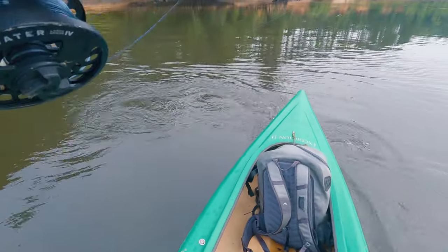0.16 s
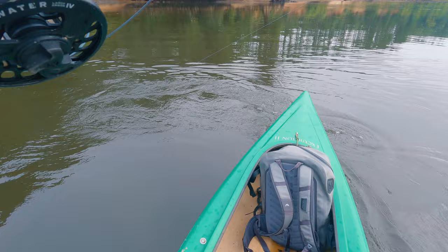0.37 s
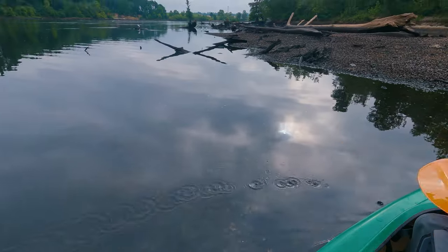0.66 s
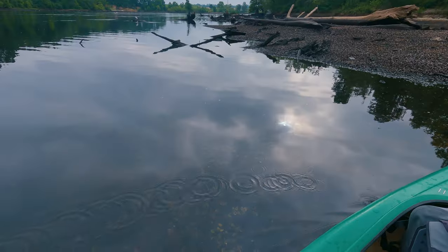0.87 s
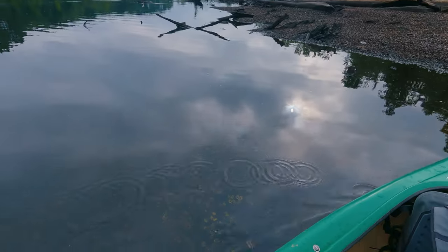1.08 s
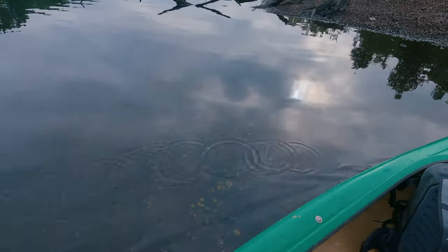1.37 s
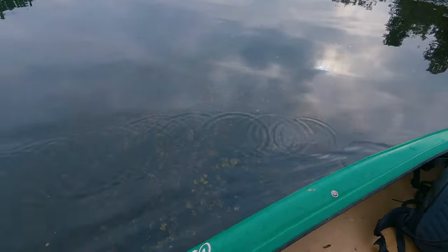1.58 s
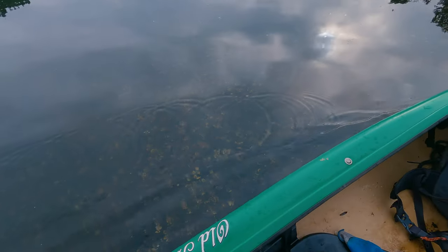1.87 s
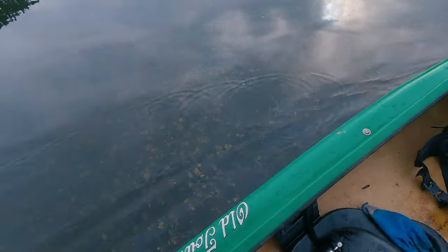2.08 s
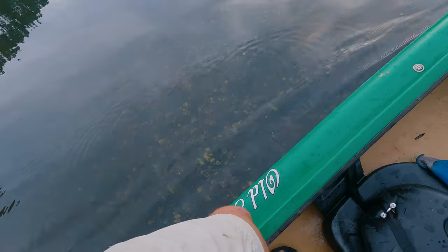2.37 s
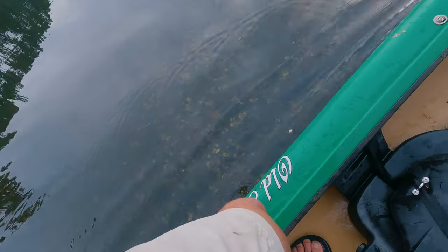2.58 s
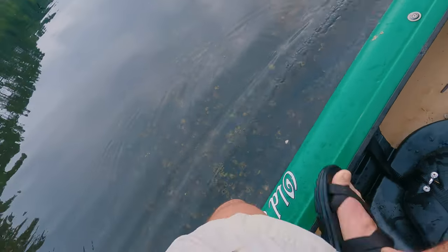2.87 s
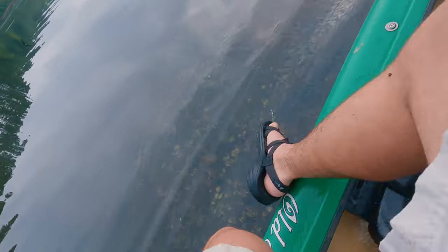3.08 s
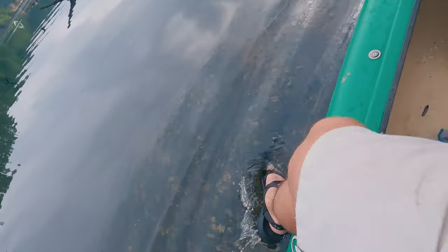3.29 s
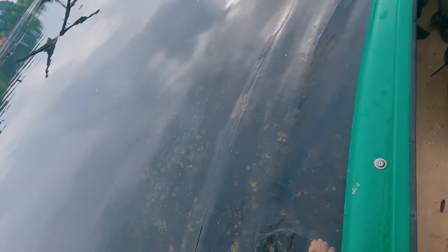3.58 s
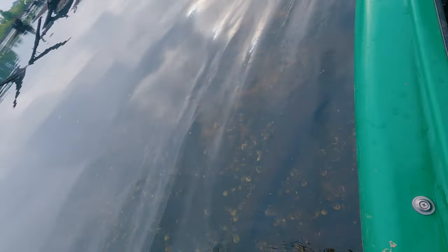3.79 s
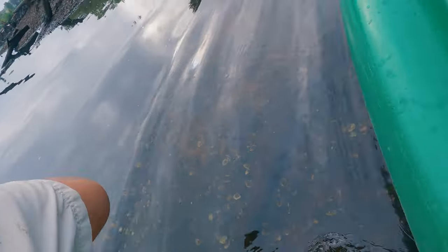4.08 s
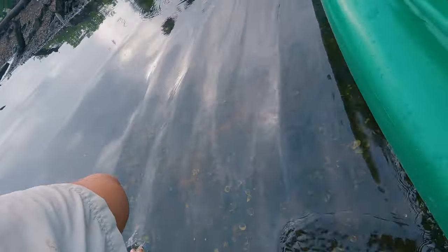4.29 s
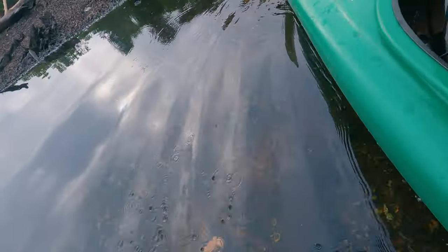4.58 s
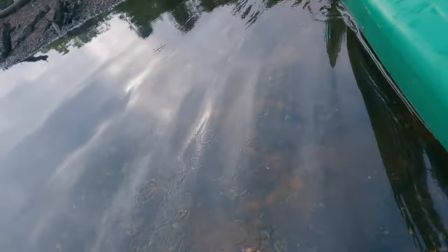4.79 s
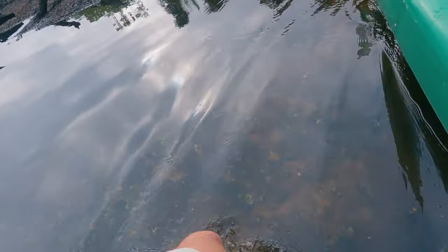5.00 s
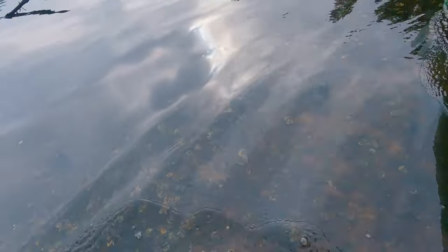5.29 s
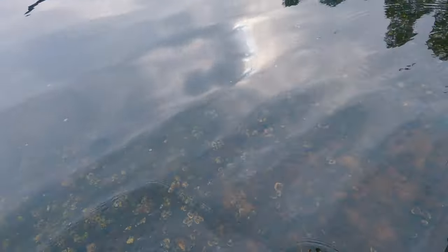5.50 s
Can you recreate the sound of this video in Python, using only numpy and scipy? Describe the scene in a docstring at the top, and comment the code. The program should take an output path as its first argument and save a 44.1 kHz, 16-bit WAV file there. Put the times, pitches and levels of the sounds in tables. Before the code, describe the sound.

A soft, steady hiss of insects and distant water runs throughout, with a low, light breeze. The opening is quiet until a dull bump on the microphone at 1.3 seconds. At about 1.7 seconds comes a loud, close cluster of hollow knocks and clacks as paddle and gear hit a plastic canoe, then a deep thump at 2.2 with rubbing. From around 2 seconds a faint, high insect chirps in rapid, even pulses. A wet sole squeaks briefly at 2.6, followed by more knocks and small wet slaps. From 3.2 seconds someone steps into shallow water: bubbles plop and light spray fizzes around the legs. Strong hull thumps land near 3.1, 3.8 and 4.7 seconds, with another microphone bump at 3.9 and a short, low creak at 4.4. Gurgling and hull rubbing continue, the water easing after 5.2, with light knocks until the end at about 5.6 seconds.

```python
"""Someone shifts about in a plastic canoe on a calm river, then steps into the shallows.
Insects and far water hiss along the bank in a light breeze. The microphone is bumped at 1.3 s.
From 1.6 s paddle, feet and gear knock and rub, ringing the hollow hull; an insect starts chirping.
A wet sole squeaks by stick-slip at 2.6 s. From 3.2 s bubbles ring and spray fizzes round the legs,
with a short groan at 4.4 s. Loud sounds duck the gain."""
import sys
import numpy as np
from scipy import signal
from scipy.fft import rfft, irfft, next_fast_len
from scipy.io import wavfile
from scipy.ndimage import uniform_filter1d, minimum_filter1d

SR = 44100
rng = np.random.default_rng(int(sys.argv[2]) if len(sys.argv) > 2 else 0)


def int16_out(signal):
    """Quantize to a 16-bit WAV file."""
    q = np.round(np.clip(np.atleast_2d(signal).T, -1, 1) * 32767)
    wavfile.write(sys.argv[1], SR, q.astype(np.int16))


N = 248724

# Table levels are relative; each source adds its own offset.
# blows on the hull: t/s, thud/dB, boom/dB, struck panel f/Hz, clack/dB, crunch/dB
HULL_BLOWS = [(0.106, -46, -48, 380, -48, -49), (0.139, -46, -41, 277, -39, -76),
              (1.648, -6.5, -23, 264, -21, -22.5), (1.665, -7.5, -14, 275, -14.5, -29.5),
              (1.679, 0, -32, 192, -18, -28), (1.7, -9, -2.5, 330, -42, -60),
              (1.759, -37, -7, 200, -41, -38.5), (1.867, -29, -21, 173, -36, -64),
              (1.948, -58, -60, 300, -32.5, -41), (2.205, -13, 2, 164, -36, -76),
              (2.213, -12.5, -6, 242, -34, -40), (2.356, -20.5, -14, 320, -33, -40),
              (2.634, -18, -30, 251.8, -19, -26), (2.647, -27, -25, 295, -25.5, -25.5),
              (2.801, -22.5, -39, 357, -33, -29), (2.833, -20.5, -27, 229, -24.5, -45),
              (3.036, -13, -15, 420, -28.5, -59), (3.054, -12, -4.5, 140, -62, -69),
              (3.097, -21.5, -13.5, 160, -26.5, -43), (3.167, -26, -12, 303, -26.5, -45),
              (3.433, -22, -35, 337, -43, -43.5), (3.773, -21.5, -32, 273, -18.5, -41),
              (3.795, -9, -9.5, 193, -25, -48), (3.813, -9, -0.5, 210, -25, -45),
              (3.95, -12.5, -14, 151, -29, -40.5), (4.197, -30, -48, 309, -31.5, -42),
              (4.635, -50, -64, 279, -35.5, -43.5), (4.715, -11.5, 0, 268, -46, -62),
              (4.798, -14.5, -13, 140, -32, -39), (4.821, -17, -31, 164, -55, -37.5),
              (5.018, -27, -21.5, 141.2, -50, -59), (5.438, -26, -21, 302, -36, -41.5),
              (5.599, -22, -52, 250, -56.5, -70)]
# weight and feet working on the hull: t/s, flex/dB, rub/dB
HULL_LOAD = [(0, -77, -50.5), (.46, -64, -59.5), (.48, -65, -76.5), (1.6, -49.5, -59), (1.72, -44, -28),
             (1.9, -66, -48), (2.19, -77, -56.5), (2.3, -31.5, -30.5), (2.55, -32, -41.5), (2.9, -49, -43),
             (3.2, -28, -41), (3.45, -56, -47), (3.9, -20.5, -34.5), (4.1, -38, -35.5), (4.68, -50.5, -50),
             (4.9, -23, -37), (5.12, -27.5, -48.5), (5.23, -44.5, -46.5), (5.64, -32, -45.5)]
# hull modes: f/Hz, level/dB, t60/s
HULL_MODES = [(66.5, -17, 0.16), (83, 2, 0.13), (98.54, 1.5, 0.073), (148, 2, 0.088), (194.1, 1.5, 0.23),
              (247, -5, 0.081), (272.3, 6, 0.051), (313, 0, 0.15), (372, 2.5, 0.083), (492, 8.5, 0.033),
              (568.6, 1.5, 0.04), (652, 9, 0.016), (804, -2.5, 0.081), (919, 10, 0.014),
              (1145, -3.5, 0.048), (1265, -0.5, 0.041), (1520, 1, 0.011), (1670, 0, 0.018),
              (1750, 6, 0.0084)]
# spectrum of the dense upper modes: f/Hz, density/dB
CRUNCH_SPECTRUM = [(880, 1.5), (1500, 3.5), (3190, -5.5), (4300, -10.5), (5380, -19), (8500, -33),
                   (11000, -72)]
# ticks of gear and drops: t/s, level/dB, f/Hz
GEAR_AND_DROP_TICKS = [(1.645, -15, 2830), (1.648, -10.5, 5195), (1.647, -22, 9100), (1.671, -28, 7300),
                       (1.68, -13, 3330), (1.68, -21, 5600), (1.761, -24, 3620), (1.949, -27.5, 6040),
                       (2.213, -27, 8700), (2.636, -35, 11900), (2.733, -34.5, 11300), (3.106, -29, 3700),
                       (3.149, -40, 8800), (3.189, -22.5, 3840), (3.317, -19, 3770), (3.351, -26.5, 2390),
                       (3.573, -47, 6800), (3.679, -39, 9600), (3.692, -24.5, 3400), (3.95, -38, 3610),
                       (4.049, -24, 4270), (4.025, -38, 10100), (4.198, -16.5, 1470), (4.408, -44, 11200),
                       (4.638, -27, 4130), (4.82, -27, 3430), (5.441, -30, 4040)]
# wet slaps of a sole or wavelet: t/s, level/dB, f/Hz
WET_SLAPS = [(2.833, -16, 1000), (3.097, -14.5, 1030), (3.169, -20.5, 1070), (3.215, -15.5, 1110),
             (3.316, -24, 1030), (3.433, -35, 890), (4.198, -18.5, 1210), (4.455, -20, 740)]
# loudest single bubbles: t/s, level/dB, f/Hz, glide/ratio (see add_ping)
SINGLE_BUBBLES = [(3.264, -22.5, 2100, -0.026), (3.455, -22.5, 2470, 0.11), (3.39, -31.5, 1660, 0.06),
                  (3.51, -33, 1610, 0.041), (3.538, -25, 2350, -0.013), (3.742, -26.5, 2170, -0.07),
                  (3.917, -22.5, 2110, 0.059), (3.993, -25, 2130, 0.015), (4.013, -17.5, 1730, 0.83),
                  (4.03, -24.5, 1270, .9), (4.05, -24.5, 1800, 0.92), (4.059, -25.5, 1580, 0.39),
                  (4.07, -33, 1640, 0.16), (4.082, -21, 2270, -0.37), (4.137, -26, 1380, 0.39),
                  (4.12, -33.5, 713, 0.17), (4.17, -33, 696, 0.036), (4.25, -28.5, 710, -0.014),
                  (4.566, -22.5, 826, 0.29), (4.636, -25.5, 695, 0.45), (4.782, -20.5, 787, -0.17),
                  (4.802, -19.5, 2620, 0.32), (4.82, -18.5, 627, -0.25), (4.886, -22.5, 535, -0.094),
                  (4.925, -17.5, 922, 0.42), (5.017, -27, 558, 0.26), (5.032, -30, 1620, -0.11),
                  (5.052, -23, 1700, 0.058), (5.075, -26, 751, -0.14), (5.096, -25.5, 2020, 0.12),
                  (5.163, -27.5, 1520, 0.013), (5.206, -32, 770, 0.019), (5.377, -26.5, 610, 0.19)]
# stirred water: t/s, gurgle/dB, spray/dB
WATER_STIR = [(2.2, -54, -62), (3.0, -52.5, -61), (3.2, -52, -56.5), (3.86, -45, -55), (3.92, -43.5, -63),
              (4.07, -51.5, -56.5), (4.25, -68, -85.5), (4.45, -41, -60), (5.1, -42.5, -59.5),
              (5.222, -58, -71), (5.64, -58, -88)]
# sole slipping on plastic: t/s, slip rate/Hz, level/dB
SOLE_SLIP = [(2.553, 820, -30), (2.568, 760, -24), (2.578, 710, -20), (2.596, 595, -26), (2.615, 660, -33)]
# squeak partials: f/slip rate, level/dB
SOLE_PARTIALS = [(1, 2), (2, -7), (3, -20.5)]
# bumps on the microphone housing: t/s, level/dB, f/Hz, t60/s
HOUSING_BUMPS = [(1.259, -30, 305, 0.053), (1.291, -13.5, 290, 0.025), (1.351, -21, 269, 0.0079),
                 (3.919, -17, 259, 0.046)]
# hiss of insects and far water, with microphone-housing peaks near 8 and 12 kHz
# that also colour the spray: f/Hz, density/dB
HISS_SPECTRUM = [(880, -81), (1500, -3), (1930, -1), (2220, 6.5), (2860, 8.5), (3280, 8.5), (3990, 9),
                 (4800, 7), (5400, 9.5), (7090, 1.5), (7550, 1), (7850, 6), (8200, -0.5), (9100, -10),
                 (10900, -14), (11500, -16), (12000, -8.5), (12600, -18.5), (14600, -25), (15500, -44)]
# breeze: f/Hz, density/dB
BREEZE_SPECTRUM = [(15, -19), (25, 2.5), (46, -8.5), (65, -12.5), (280, -20), (528, -38.5),
                   (1500, -35), (1950, -94)]
# two microphone ports: f/Hz, left lead/rad, diffuse likeness/ratio
MIC_PORTS = [(30, 1, 0.69), (77, 0.22, 0.9), (246, -0.36, 0.47), (730, -0.61, 0.15), (1500, -1.1, 0.71),
             (2670, -1.45, 1), (4770, -0.67, 0.84), (9900, 0.96, 0.65)]

TIME_S = np.arange(N) / SR
FFT_SIZE = next_fast_len(N + SR // 10)
BIN_HZ = np.maximum(np.arange(FFT_SIZE // 2 + 1) * SR / FFT_SIZE, 1)


def hull():
    """Hull modes rung by blows and by the steady flexing and rubbing of weight and feet."""
    _, thud_db, boom_db, panel_hz, clack_db, crunch_db = np.transpose(HULL_BLOWS)
    flex_db, rub_db = envelopes(HULL_LOAD)
    friction = grains(per_s=600, spread_db=4.5) * from_db(3.5 * drift(13.7) - 2)
    chatter = rng.standard_normal((len(HULL_BLOWS), 2, SR // 10))
    boom = blow_force(boom_db - 9.5, chatter[:, 0], stretch=2.3, touch=1.03)
    clack = blow_force(clack_db - 3, chatter[:, 1], stretch=1)
    modes = np.zeros(N)
    for k, (hz, level_db, t60_s) in enumerate(HULL_MODES):
        if hz < 125:
            blows, steady_db = boom, flex_db - 23.5
        elif hz < 450:
            drive_db = thud_db - 6.5 - 38 * np.log2(hz / panel_hz) ** 2  # favours the struck panel
            blows = blow_force(drive_db, chatter[:, k % 2], stretch=0.95, touch=0.99)
            steady_db = rub_db - 27
        else:
            blows, steady_db = clack, rub_db - 32.5
        force = blows + from_db(steady_db) * np.roll(friction, 997 * k)  # shift decorrelates modes
        modes += (-1) ** k * from_db(level_db) * ring(force, hz, t60_s)
    crunch = shaped(blow_force(crunch_db + 33.5, chatter[:, 0], stretch=0.67), CRUNCH_SPECTRUM)
    tick_force = blow_force(crunch_db + 5, chatter[:, 1], stretch=0.86)
    tick = signal.sosfilt(signal.butter(2, [7000, 12500], "band", fs=SR, output="sos"), tick_force)
    return modes + crunch + tick


def blow_force(levels_db, chatter, stretch, touch=0.32):
    """Force of all blows: a clean first touch, then chatter dying over the contact time."""
    contact_s = 0.017 * stretch
    out, n, width = np.zeros(N), np.arange(chatter.shape[1]), contact_s * SR
    envelope = (1 - np.exp(-n / (0.042 * width))) * np.exp(-n / width) / np.sqrt(width / 2)
    for blow, level_db, noise in zip(HULL_BLOWS, levels_db, chatter):
        force = noise * envelope
        force[0] += touch
        place(out, blow[0], from_db(level_db) * force)
    return out


def ticks(t60_s=0.014, q=6.5):
    """Gear and drops: short bursts of resonant noise."""
    out, t = np.zeros(N), np.arange(SR // 50) / SR
    for start_s, level_db, hz in GEAR_AND_DROP_TICKS:
        noise = rng.standard_normal(len(t))
        r, w = np.exp(-np.pi * hz / q / SR), 2 * np.pi * hz / SR
        burst = signal.lfilter([1, 0, -1], [1, -2 * r * np.cos(w), r * r], noise + np.roll(noise, 1))
        place(out, start_s, from_db(level_db - 5 - 60 * t / t60_s) * unit_rms(burst))
    return out


def slaps():
    """Wet slaps of sole or wavelet: a few dying cycles each."""
    out = np.zeros(N)
    for start_s, level_db, hz in WET_SLAPS:
        add_ping(out, start_s, level_db + 3, hz, t60_s=0.0081, glide=0.14, attack_cycles=0.26)
    return out


def water(onset_s=2.1):
    """Stirred water: (ringing bubbles, single and in clumps; fizzing spray)."""
    gurgle_db, spray_db = envelopes([(onset_s, -68, -100)] + WATER_STIR)
    single, small = np.zeros(N), np.zeros(N)
    for start_s, level_db, hz, glide in SINGLE_BUBBLES:
        t60_s = 0.037 * (1500 / hz) ** 1.03  # big bubbles ring longer
        add_ping(single, start_s, level_db, hz, t60_s, glide, attack_cycles=1.9)
        lag, interval = rng.random(2)  # a smaller one breaks off
        add_ping(single, start_s + 0.02 * lag, level_db - 11, hz * 1.6 ** (interval + 0.2),
                 0.7 * t60_s, glide=0.07, attack_cycles=1.1)
    for when, pitch, size, ringing, rise in rng.random((2600, 5)):
        start_s = onset_s + when * (N / SR - onset_s)
        hz = 550 * 6 ** pitch ** 1.3
        t60_s = (9 + 70 * ringing ** 3) / hz
        add_ping(small, start_s, 14 * size ** 2, hz, t60_s, glide=0.25 * rise ** 2 - 0.03)
    gurgle = from_db(gurgle_db + 3 * drift(12)) * unit_rms(small)
    spray_spectrum = [(hz, db + 1.3 * np.log2(hz / 5000)) for hz, db in HISS_SPECTRUM]
    droplets = np.array([grains(per_s=1500, spread_db=1.8), grains(per_s=1300, spread_db=5.7)])
    bubbles = from_db(3.95 * drift(136)) * single + gurgle
    spray = from_db(spray_db + 11.5 + 3.3 * drift(16.5)) * shaped(droplets, spray_spectrum)
    return bubbles, spray


def sole_squeak():
    """A wet sole slips on the plastic, slowing as it grips."""
    return stick_slip(SOLE_SLIP, SOLE_PARTIALS, rough_db=4.5, dulling=0.73, wobble=0.033)


def groan():
    """Low stick-slip tone: swells, holds while its pitch climbs, fades."""
    times_s = 4.38 + np.cumsum([0, 0.0402, 0.074, 0.021])
    hz, level_db = [270, 270, 312.5, 312.5], [-35.5, -22.5, -22.5, -35.5]
    partials = [(0.67, -10.5), (1, -1.5), (1.6, -11.5)]
    return stick_slip(list(zip(times_s, hz, level_db)), partials, rough_db=4, dulling=0, wobble=0.057)


def stick_slip(curve, partials, rough_db, dulling, wobble):
    """Regular slips: wavering rate, stuttering partials; dulling darkens the softer slips."""
    (start_s, start_hz, _), (end_s, end_hz, _) = curve[0], curve[-1]
    hz, level_db = envelopes([(start_s - 0.01, start_hz, -90), *curve, (end_s + 0.015, end_hz, -90)])
    phase = 2 * np.pi * np.cumsum(hz * (1 + wobble * drift(31.9))) / SR
    tilt_db = dulling * (level_db - level_db.max())
    tone = sum(from_db(db + (k - 1) * tilt_db + rough_db * drift(53)) * np.sin(k * phase)
               for k, db in partials)
    return np.sqrt(2) * from_db(level_db) * tone


def housing_bumps():
    """Dull bump, lower housing ring, faint click; nearer the right port, late at the left."""
    bumps = np.zeros(N)
    for start_s, level_db, hz, t60_s in HOUSING_BUMPS:
        add_ping(bumps, start_s, level_db + 10, hz, t60_s)
        add_ping(bumps, start_s, level_db + 0.5, 0.52 * hz, 1.5 * t60_s, attack_cycles=0.6)
        add_ping(bumps, start_s, level_db - 16.5, hz=1700, t60_s=0.008, glide=2.15, attack_cycles=0.1)
    bumps *= from_db(1.5 * drift(60))  # mount rattle
    delayed = np.interp(TIME_S - 0.001023, TIME_S, bumps)
    return np.array([from_db(5.5) * delayed, from_db(10.5) * bumps])


def insect(chirps_per_s=10.75, pitch_hz=5680, sag_hz_per_s=170, fall_hz_per_s=20000):
    """Even, rasping chirps, each falling in pitch; the song sags slowly and softens late."""
    t = TIME_S - 2.61  # zero at a chirp's centre
    offset_cycles = (t * chirps_per_s + 0.5) % 1 - 0.5
    hz = pitch_hz - sag_hz_per_s * t - fall_hz_per_s * offset_cycles / chirps_per_s
    noise = rng.standard_normal((2, N))
    rasp = 1 + 10 * signal.sosfilt(signal.butter(2, 450, fs=SR, output="sos"), noise)
    chirps = rasp * np.sin(2 * np.pi * np.cumsum(hz) / SR) * np.cos(np.pi * offset_cycles) ** 16
    swell = np.clip((TIME_S - 1.94) / 0.44, 0, 1)
    level_db = -56 - np.clip((TIME_S - 3.5) / 0.1, 0, 1)
    return swell * from_db(level_db) * unit_rms(chirps)


def bank_hiss():
    """Steady hiss of insects and far water, with microphone-housing peaks near 8 and 12 kHz."""
    return from_db(-48.5) * shaped(rng.standard_normal((2, N)), HISS_SPECTRUM)


def breeze():
    """Low air noise in slight gusts."""
    return from_db(-47.5 + 1.5 * drift(2.5)) * shaped(rng.standard_normal((2, N)), BREEZE_SPECTRUM)


def mic_ports(near, diffuse):
    """Stereo from two phase-shifted ports; diffuse sound (shared, unshared) is only partly alike."""
    likeness = np.clip(at_bins(MIC_PORTS, column=2), 0, 1)
    shared, unshared = rfft(diffuse, FFT_SIZE)
    mid = rfft(near, FFT_SIZE) + np.sqrt(likeness) * shared
    side = np.sqrt(1 - likeness) * unshared
    half_lead = np.exp(0.5j * at_bins(MIC_PORTS))
    return irfft([(mid + side) * half_lead, (mid - side) / half_lead], FFT_SIZE)[:, :N]


def gain_control(pair, threshold_db=-19.5, max_cut_db=6.5):
    """Gain that drops on loud sound, holds, then creeps back."""
    window_s, attack_s, hold_s, release_db_per_s = 0.049, 0.083, 0.52, 8
    power = np.abs(uniform_filter1d(np.mean(pair ** 2, axis=0), int(window_s * SR)))
    cut_db = np.clip(10 * np.log10(power + 1e-12) - threshold_db, 0, max_cut_db)
    delayed_db = lambda delay_s: np.interp(TIME_S - delay_s, TIME_S, cut_db, left=0)
    ramp_db = release_db_per_s * TIME_S
    release_db = np.maximum.accumulate(delayed_db(hold_s) + ramp_db) - ramp_db
    held_db = -minimum_filter1d(-delayed_db(hold_s / 2 + window_s / 2), int(hold_s * SR))
    r = np.exp(-1 / (attack_s * SR))
    return from_db(-signal.lfilter([1 - r], [1, -r], np.maximum(release_db, held_db)))


def from_db(db):
    """Decibels to gain."""
    return 10 ** (np.asarray(db) / 20)


def unit_rms(x):
    """Scale to rms 1."""
    return x / np.sqrt(np.mean(x ** 2) + 1e-20)


def envelopes(rows):
    """Columns of a time table at every sample."""
    times_s, *columns = np.transpose(rows)
    return [np.interp(TIME_S, times_s, column) for column in columns]


def at_bins(rows, column=1):
    """A spectrum column at every FFT bin, interpolated in log frequency."""
    columns = np.transpose(rows)
    return np.interp(np.log(BIN_HZ), np.log(columns[0]), columns[column])


def shaped(x, spectrum):
    """Colour by a dB spectrum; white input keeps its power."""
    gain = unit_rms(from_db(at_bins(spectrum)))
    return irfft(rfft(x, FFT_SIZE) * gain, FFT_SIZE)[..., :N]


def drift(corner_hz):
    """Low-passed random wander, rms 1."""
    step = 40
    r = np.exp(-2 * np.pi * corner_hz * step / SR)
    slow = signal.lfilter([1], [1, -2 * r, r * r], rng.standard_normal(N // step + 2002))[2000:]
    return np.interp(np.arange(N) / step, np.arange(len(slow)), unit_rms(slow))


def grains(per_s, spread_db):
    """Random clicks of uneven size, rms 1."""
    sizes = from_db(spread_db * np.minimum(rng.exponential(1, N), 4)) * rng.choice([-1, 1], N)
    return unit_rms(sizes * (rng.random(N) < per_s / SR))


def ring(force, hz, t60_s):
    """One mode: a unit click rings a dying sine of height 1."""
    r, w = from_db(-60 / (t60_s * SR)), 2 * np.pi * hz / SR
    return signal.lfilter([0, np.sin(w)], [1, -2 * r * np.cos(w), r * r], force + 1e-18)


def place(out, start_s, sound):
    """Mix a sound in at start_s."""
    at = round(start_s * SR)
    out[at:at + len(sound)] += sound[:N - at]


def add_ping(out, start_s, level_db, hz, t60_s, glide=0, attack_cycles=1):
    """Mix in a dying sine whose pitch ends at hz * (1 + 2 * glide)."""
    t = np.arange(int(t60_s * SR)) / SR
    envelope = from_db(level_db - 60 * t / t60_s) * (1 - np.exp(-t * hz / attack_cycles))
    place(out, start_s, envelope * np.sin(2 * np.pi * hz * (t + glide * t ** 2 / t60_s)))


def scene():
    """Boat and bubbles close; spray, breeze, bank and insect from all round."""
    bubbles, spray = water()
    near = hull() + ticks() + slaps() + sole_squeak() + groan() + bubbles
    diffuse = spray + breeze() + bank_hiss() + insect()
    return mic_ports(near, diffuse) + housing_bumps()


def record(dry):
    """Gain control, left 1 dB up, changing width, rumble cut, soft clip, top cut."""
    left, right = dry * gain_control(dry) * from_db([[0.5], [-0.5]])
    width = (TIME_S > 0.462) * np.interp(TIME_S, [3.72, 4.71], [1, 0])  # mono, stereo, fade to mono
    mid, side = (left + right) / 2, width * (left - right) / 2
    pair = signal.sosfilt(signal.butter(2, 38, "high", fs=SR, output="sos"), [mid + side, mid - side])
    clipped = 1.002 * np.tanh(pair / 0.83)
    return signal.sosfilt(signal.cheby2(12, 60, 15950, fs=SR, output="sos"), clipped)


dry = scene()
out = record(dry)
int16_out(out)
```